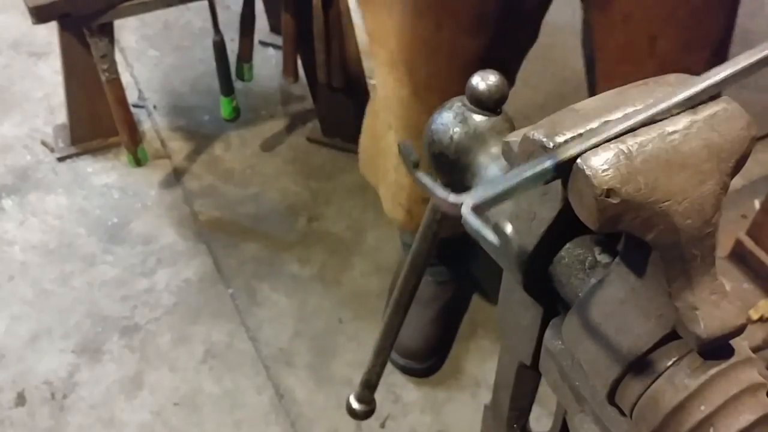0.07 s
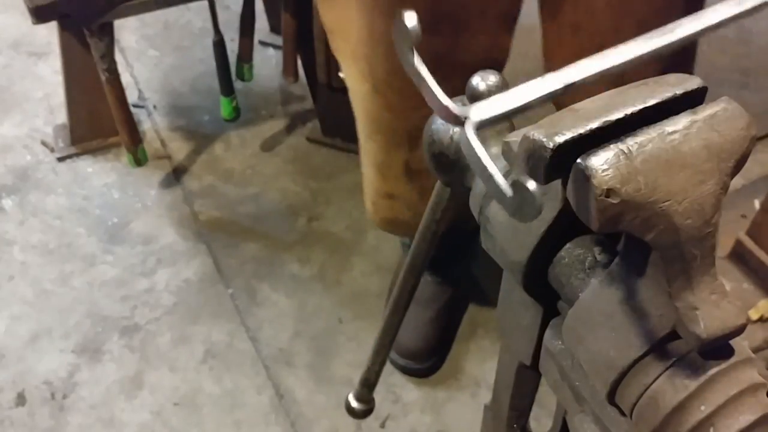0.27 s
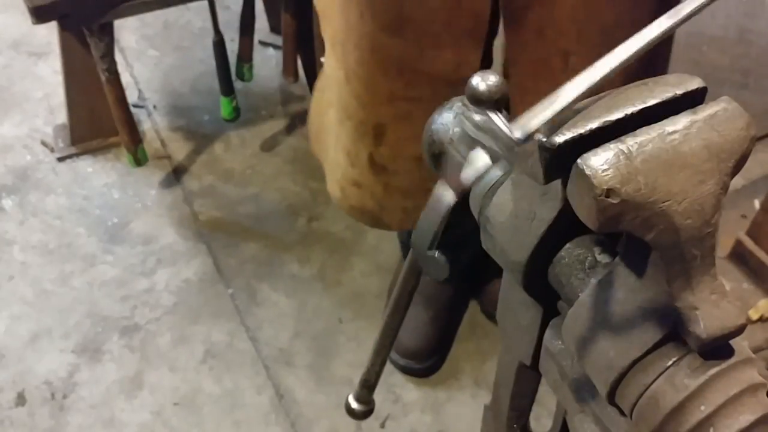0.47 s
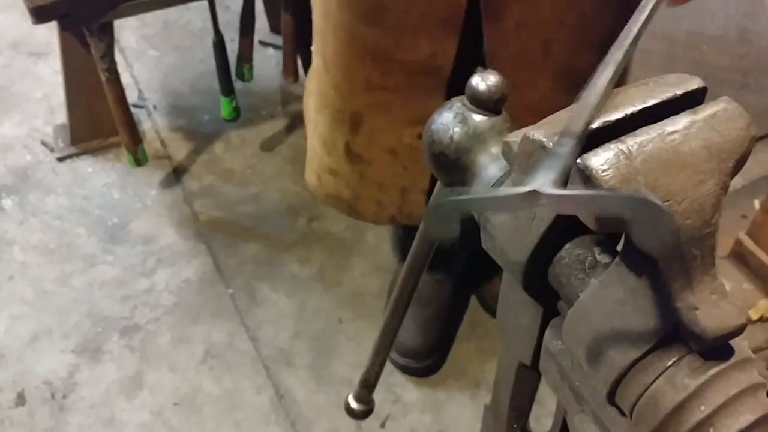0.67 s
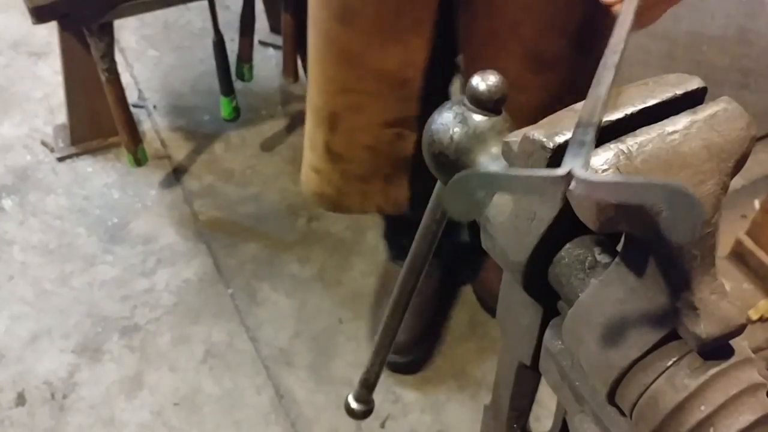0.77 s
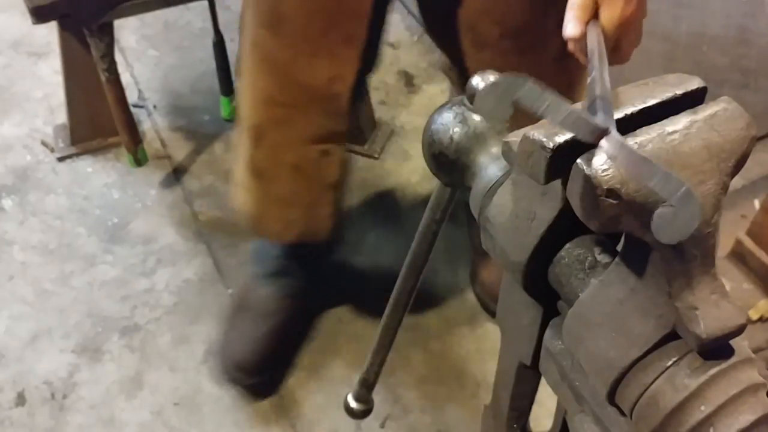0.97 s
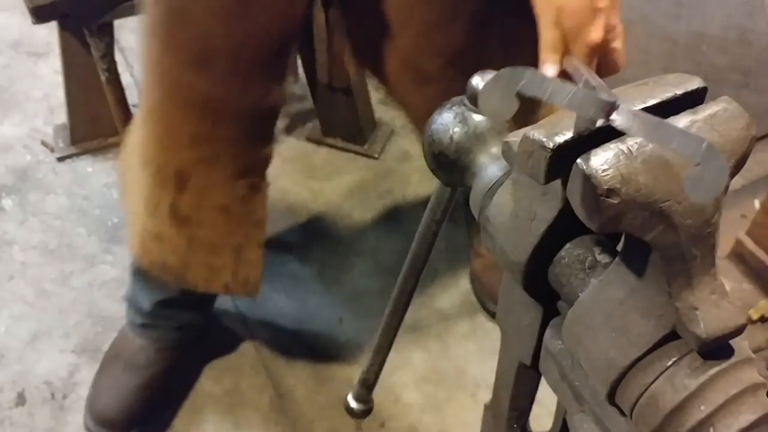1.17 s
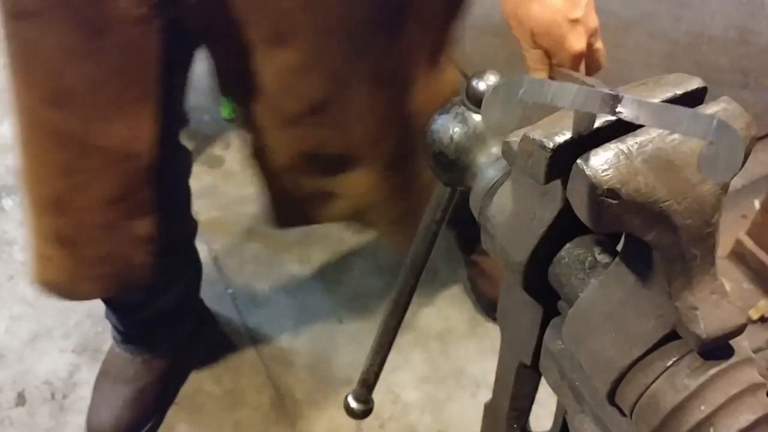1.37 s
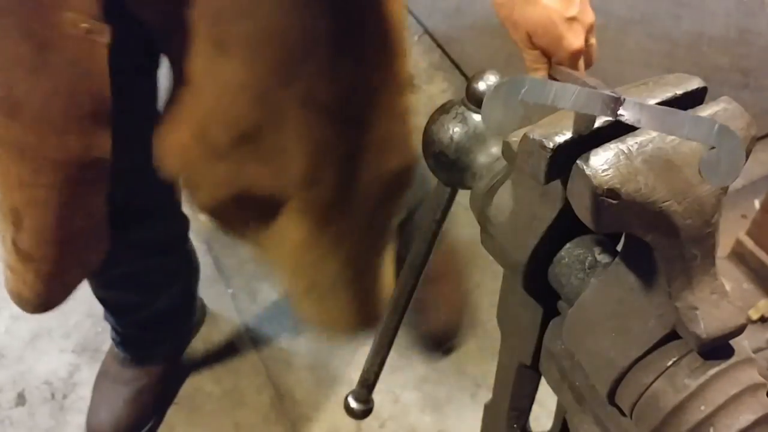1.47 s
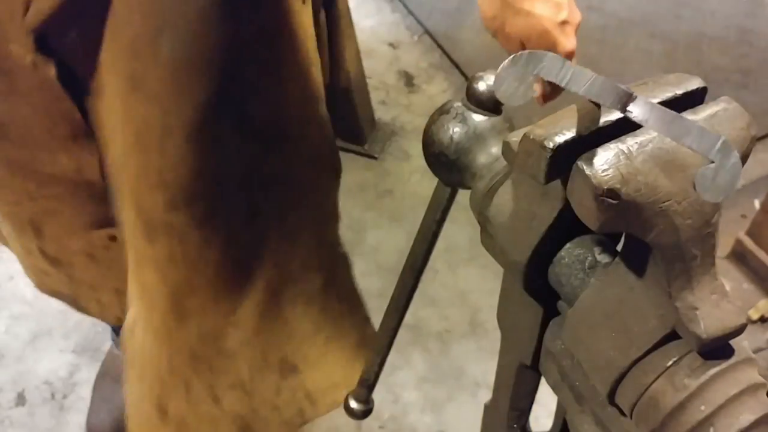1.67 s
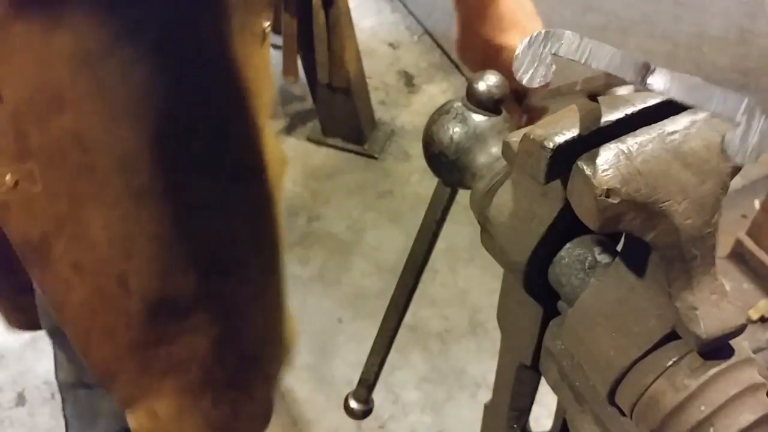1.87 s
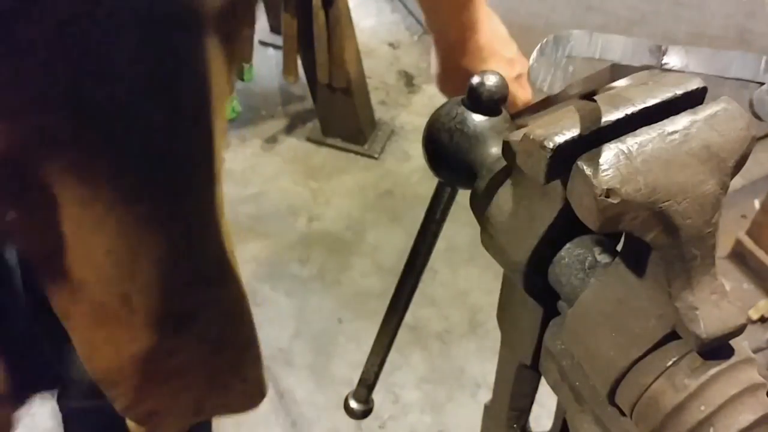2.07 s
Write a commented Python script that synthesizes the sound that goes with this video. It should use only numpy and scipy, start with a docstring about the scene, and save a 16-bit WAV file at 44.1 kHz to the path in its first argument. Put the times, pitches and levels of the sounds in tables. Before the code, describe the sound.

A forged steel piece comes off a vise with one crisp clink and a short ringing rattle, between boot scuffs and steps on concrete and soft leather rustle; quiet room hum, short reverb, close microphone.

```python
"""A small, hard-walled workshop: a forged steel hook comes free of a bench vise.
It scrapes along the jaw and clinks, then knocks against the vise and chatters on it for a moment.
Boots scuff and step on the concrete and a leather apron rustles, over room air, a low hum and rumble.
Steel rings as decaying, beating modes with short noise clashes; rubbing is shaped noise;
footfalls are hollow modal knocks over puffs of noise. Walls answer the steel and the footwork."""
import sys
import numpy as np
from scipy import signal
from scipy.fft import rfft, irfft, next_fast_len
from scipy.io import wavfile
from scipy.ndimage import map_coordinates

SR = 44100
rng = np.random.default_rng(int(sys.argv[2]) if len(sys.argv) > 2 else 0)


def master_out(mix):
    """Clip the mix to full scale and print it as 16-bit PCM to the path in sys.argv[1]."""
    frames = np.transpose(np.atleast_2d(mix))
    ceiling = np.clip(frames, -1, 1)
    pcm = np.round(ceiling * 32767).astype(np.int16)
    wavfile.write(sys.argv[1], SR, pcm)


N = 93271  # length [samples]


def amp(db):
    """Decibels to gain."""
    return 10 ** (np.asarray(db) / 20)


def unit(x):
    """Scale to rms 1."""
    return x / np.sqrt(np.mean(x ** 2) + 1e-20)


def along(points, hz):
    """Read a table of (frequency [Hz], value) at any pitch, on a log axis."""
    f, v = np.transpose(points)
    return np.interp(np.log(hz + 1), np.log(f + 1), v)


def seconds():
    """The time of each sample."""
    return np.arange(N) / SR


def wobble(rate, t=None):
    """A smooth random curve with rate random knots a second, read at times t."""
    if t is None:
        t = seconds()
    knots = rng.standard_normal(int(N * rate / SR) + 4)
    return map_coordinates(knots, [t * rate])


def filtered(x, response):
    """x shaped by a gain that depends on frequency; padding keeps the end off the start."""
    m = next_fast_len(x.shape[-1] + SR // 5)
    gain = response(np.fft.rfftfreq(m, 1 / SR))
    return irfft(rfft(x, m) * gain, m)[..., :x.shape[-1]]


# how alike the two channels of noise are: (frequency [Hz], likeness [0 to 1])
LIKENESS = [(60, 0.94), (140, 0.84), (300, 0.83), (700, 0.36), (1400, 0), (4000, 0), (12000, 0.1)]


def noise(spectrum, size=N):
    """Coloured stereo noise of rms 1, near mono in the bass and wide above."""
    def middle_and_side(hz):
        turn = np.arccos(np.clip(along(LIKENESS, hz), -1, 1)) / 2
        return amp(along(spectrum, hz)) * [np.cos(turn), np.sin(turn)]

    mid, side = filtered(rng.standard_normal((2, size)), middle_and_side)
    return unit(np.array([mid + side, mid - side]))


PIVOT_HZ = 3480  # brightness tilts about this pitch


def tilted(spectrum, tilt_db, from_hz=1):
    """The spectrum tilted by tilt_db an octave about the pivot, with no further tilt below from_hz."""
    return [(hz, db + tilt_db * np.log2(max(hz, from_hz) / PIVOT_HZ)) for hz, db in spectrum]


def fade(t, t60):
    """Exponential decay by 60 dB in t60 seconds."""
    return np.exp(-np.log(1000) * t / t60)


def burst(spectrum, t60, attack):
    """A coloured puff of noise that rises and dies away, times in seconds."""
    t = np.arange(SR // 2) / SR
    return noise(spectrum, size=len(t)) * fade(t, t60) * (1 - np.exp(-t / attack))


def friction(spectrum, grain_db, grain_rate):
    """Rubbing: noise of rms 1, clumped into tiny slips by a random level."""
    return unit(noise(spectrum) * amp(grain_db * wobble(grain_rate)))


def swells(rows):
    """Level of strokes that climb 20 dB in their rise time and drop 20 dB in their fall time."""
    t, power = seconds(), 0
    for peak_s, db, rise, fall in rows:
        drop_db = 20 * np.maximum((peak_s - t) / rise, (t - peak_s) / fall)
        power = power + amp(db - drop_db) ** 2
    return np.sqrt(power)


def add(track, s, sound):
    """Mix a sound into the track at time s."""
    part = track[:, max(0, round(s * SR)):][:, :sound.shape[1]]
    part += sound[:, :part.shape[1]]


# how long the workshop answers: (frequency [Hz], t60 [s])
ROOM = [(100, 0.057), (300, 0.47), (1000, 0.26), (2500, 0.25), (5000, 0.25), (9000, 0.23), (15000, 0.13)]
WALL_S = 0.0051  # time scale over which the walls' answer builds up [s]


def in_room(x, wet_db):
    """The direct sound plus the walls' answer: noise whose pitches die at their own rates."""
    flat = [(1, 0.011), (2, 0)]
    hz, t, z = signal.stft(noise(flat, size=SR // 2), SR, nperseg=256)
    tail = signal.istft(z * fade(t, along(ROOM, hz)[:, None]), SR, nperseg=256)[1]
    tail_s = np.arange(tail.shape[1]) / SR
    tail = tail * (1 - np.exp(-(tail_s / WALL_S) ** 2))
    answer = signal.fftconvolve(x, tail / np.linalg.norm(tail[0]), axes=1)[:, :x.shape[1]]
    return x + amp(wet_db) * answer


# colour of the room air: (frequency [Hz], relative level [dB])
AIR = [(35, -32), (60, -5), (107, -0.5), (160, -7.5), (250, -11), (370, -13.5), (600, -14), (1000, -19.5),
       (1750, -24.5), (4000, -26.5), (7000, -32), (9000, -25), (10600, -38.5), (15500, -31)]


def air():
    """The steady noise of the workshop air."""
    return amp(-63.5) * noise(AIR)


def hum():
    """A low tone whose phase and level waver."""
    phase = 2 * np.pi * 102.2 * seconds() + 3.03 * wobble(10)
    return np.sin(phase) * amp(-68.5 + 6.4 * wobble(6))


# surges of the rumble: (time of peak [s], level [dB], rise [s], fall [s])
SURGES = [(.04, -62, 0.033, 0.071), (.33, -54, 0.094, 0.067), (.99, -58.5, 0.14, 0.06),
          (1.64, -59.5, 0.059, 0.071)]
# colour of the rumble: (frequency [Hz], relative level [dB])
RUMBLE = [(55, -14), (110, 6.5), (170, -14.5), (350, -29.5), (1000, -55)]


def rumble():
    """Low noise that comes and goes."""
    return swells(SURGES) * noise(RUMBLE)


def background():
    """Room air, a wavering low hum and a surging rumble."""
    return air() + hum() + rumble()


# a boot shifts softly: (time of peak [s], level [dB], rise [s], fall [s])
SHUFFLES = [(1.525, -64, 0.078, 0.067)]
# colour of the shuffle: (frequency [Hz], relative level [dB])
SHUFFLE = [(150, -14), (400, 5), (720, 1), (1100, -17), (3000, -30), (12000, -37)]


def shuffle():
    """A soft, dull swell of noise as a boot shifts."""
    return swells(SHUFFLES) * noise(SHUFFLE)


# a thin swish just before the last steps: (time of peak [s], level [dB], rise [s], fall [s])
SWISHES = [(1.807, -60, 0.035, 0.073)]
# colour of the swish: (frequency [Hz], relative level [dB])
SWISH = [(1000, -21), (3200, -9.5), (4200, -2), (4900, 1), (5700, -12), (9000, -20), (15000, -24.5)]


def swish():
    """A narrow swell of treble noise."""
    return swells(SWISHES) * noise(SWISH)


# the apron swings: (time of peak [s], level [dB], rise [s], fall [s], brightness [dB per octave])
SWINGS = [(1.387, -55.5, 0.16, 0.11, -0.5), (1.898, -56, 0.0598, 0.17, -1),
          (2.101, -54.5, 0.16, 0.19, -0.5)]
# colour of rubbing leather before that tilt: (frequency [Hz], relative level [dB])
LEATHER = [(100, 5.5), (400, 0.5), (1000, -0.5), (1600, 2), (2500, -0.5), (4800, 0), (7000, -5.5),
           (9000, 3.5), (10600, -9), (15500, -9)]


def apron():
    """Leather rustles: each swing is friction noise, grainy where the leather creases."""
    out = np.zeros((2, N))
    for *stroke, tilt_db in SWINGS:
        out += swells([stroke]) * friction(tilted(LEATHER, tilt_db), grain_db=2.8, grain_rate=170)
    return out


# a crumb of grit cracks: (time [s], level [dB])
CRUMBS = [(1.772, -50)]
# colour of the crack: (frequency [Hz], relative level [dB])
CRUMB = [(1000, -32), (4000, -23), (9000, 12), (11000, -3.5), (15500, 2.5)]


def crumbs():
    """Grit cracks in a short puff of bright noise."""
    out = np.zeros((2, N))
    for s, db in CRUMBS:
        add(out, s, amp(db) * burst(CRUMB, t60=0.032, attack=0.00092))
    return out


# soles slide: (time of peak [s], level [dB], rise [s], fall [s], brightness [dB per octave])
SCUFFS = [(.01, -46, 0.15, 0.08, -3), (0.138, -58, .04, 0.046, -3.5), (0.282, -53, 0.024, 0.032, 2),
          (0.323, -43, 0.046, 0.042, 0.5), (1.216, -56.5, 0.017, 0.03, 0.5),
          (1.238, -50, 0.046, 0.045, 4.5), (1.859, -49.5, 0.043, 0.058, 1)]
# colour of gritty concrete before that tilt: (frequency [Hz], relative level [dB])
GRIT = [(100, -9.5), (250, -8), (500, 0), (850, 1.5), (1500, -6), (3400, -14), (5500, -11), (7300, -15),
        (9100, -0.5), (10600, -19.5), (15500, -20.5)]


def scuffs():
    """Soles slide on gritty concrete as swells of noise."""
    out = np.zeros((2, N))
    for *stroke, tilt_db in SCUFFS:
        out += swells([stroke]) * noise(tilted(GRIT, tilt_db))
    return out


# modes of a boot heel: (frequency [Hz], mean relative level [dB], t60 [s])
HEEL = [(380, -4, 0.08), (560, -2, 0.025), (710, 1, 0.04), (855, 2, 0.06), (1040, -5, 0.03),
        (1310, -4, .03), (1740, -13, 0.03)]
# colour of the dull puff under the knock: (frequency [Hz], relative level [dB])
BOOT = [(60, -30), (130, 1), (280, 2), (500, -2.5), (820, -7), (1300, -20), (2500, -6.5), (5000, -35.5),
        (12000, -78)]


def footfall():
    """A boot meets concrete: a short hollow knock of decaying modes over a dull puff."""
    t = np.arange(SR // 2) / SR
    knock = np.zeros(len(t))
    for hz, db, t60 in HEEL:
        varied_db = db + 2 * rng.standard_normal()
        knock += amp(varied_db) * fade(t, t60) * np.sin(2 * np.pi * hz * t)
    knock *= 1 - np.exp(-t / 0.001)
    return amp(3) * knock + amp(-6) * burst(BOOT, t60=0.13, attack=0.00058)


# boot contacts in quick clusters: (time [s], gain on the footfall [dB])
STEPS = [(.001, -47.5), (.015, -56), (0.038, -54), (.056, -52), (1.238, -57), (1.8348, -50), (1.8438, -47),
         (1.8505, -50.5), (1.8578, -58), (1.875, -76)]


def steps():
    """Boots land, each contact a fresh knock."""
    out = np.zeros((2, N))
    for s, db in STEPS:
        add(out, s, amp(db) * footfall())
    return out


def footwork():
    """Boots, grit, apron and swish share the workshop's answer and sit slightly left."""
    close = scuffs() + apron() + swish() + shuffle() + steps() + crumbs()
    left_db = 1.66  # left minus right
    return in_room(close, wet_db=-8.5) * amp([[left_db / 2], [-left_db / 2]])


CHATTER_DB, CHATTER_HZ = 1.6, 600  # steel roughens on steel: depth, random knots a second

# the hook drags over the jaw: (time [s], level before the room [dB])
DRAG = [(0.523, -81), (0.528, -47), (0.545, -42.5), (0.562, -36.5), (0.58, -37.5), (.586, -75)]
# colour of the scrape: (frequency [Hz], relative level [dB])
RASP = [(50, -4.5), (110, 8), (250, -1.5), (900, -1), (1350, -6.5), (1680, 3.5), (2150, -14), (2780, 2.5),
        (3500, -6.5), (5600, 0.5), (7300, -1.5), (8400, 6), (9300, 3.5), (10600, -10.5), (15500, -7.5)]


def scrape():
    """Steel drags on steel just before the first clink, its friction catching and slipping."""
    level_db = np.interp(seconds(), *np.transpose(DRAG), left=-np.inf, right=-np.inf)
    return in_room(amp(level_db) * friction(RASP, CHATTER_DB, CHATTER_HZ), wet_db=-14)


# the vise's stand: (frequency [Hz], relative level [dB])
THUD = [(25, -43.5), (60, -9), (110, -3), (165, 1), (210, -10.5), (260, -10.5), (400, -13.5), (560, -9.5),
        (1200, -60)]


def thud():
    """The stand under the vise answers a contact with a low puff."""
    return burst(THUD, t60=0.19, attack=0.0028)


STRIKE_S = 0.0015  # time scale of the steel's onset [s]
TIP_T60, SHANK_T60 = 0.037, 0.1  # [s]: the clash is crisp at the tip and grinds longer on the shank

# crowded short-lived modes of the vise, before the tilt of each contact:
# (frequency [Hz], relative level struck by the tip [dB], relative level struck by the shank [dB])
CLASH = [(150, -32, -38), (300, -16.5, -33), (560, -6.5, -5), (750, -11.5, -17), (1080, -5, -10.5),
         (1500, -12.5, -9.5), (2180, -5, -1), (2700, -4, -8.5), (3350, -1, -1), (3700, -3.5, -18.5),
         (3960, -5, -20), (4180, 2.5, 4), (4710, -12.5, -5), (5570, -7, -5), (7200, -13.5, -15),
         (9370, -13.5, -11.5), (10080, -51, -64), (15000, -38, -57)]


def clash(place, tilt_db):
    """The crowded modes of the vise as a noise puff, roughened as the two faces chatter."""
    colour = [(hz, np.interp(place, [0, 1], levels_db)) for hz, *levels_db in CLASH]
    colour = tilted(colour, tilt_db, from_hz=PIVOT_HZ / 2)
    t60 = np.interp(place, [0, 1], [TIP_T60, SHANK_T60])
    puff = burst(colour, t60, STRIKE_S)
    chatter = unit(amp(CHATTER_DB * wobble(CHATTER_HZ)))
    return puff * chatter[:puff.shape[1]]


FLUTTER, FLUTTER_HZ = 0.42, 55  # each mode beats: depth, random knots a second
DRIFT_RAD, DRIFT_HZ = 0.22, 35  # each mode's phase wanders: depth [rad], random knots a second
TIP_RING = 0.99  # ring time at the tip as a share of that at the shank, nearly equal

# modes of hook and vise, before colour and tilt:
# (frequency [Hz], relative level struck at the tip [dB], relative level struck at the shank [dB])
STEEL = [(1110, -24, -20), (1395, -30, -16), (1690, -30, -20), (1984, -18, 2), (2015, -28, -9),
         (2133, -9, -16), (2225, 0, -31), (2258, -4, -29), (2310, -15, -13), (2405, -13, 1.5),
         (2428, -28, -5), (2545, -14, -12), (2663, -12, -18), (2952, -11, -16), (3040, -4, 0),
         (3131, -12, -3), (3163, -13, -15), (3454, -2, -5), (3875, -9, -20), (3900, -25, -3),
         (4138, -1, -21), (4216, -8, -9), (4302, -15, -3), (4351, -16, -11), (4522, -19, -19),
         (4889, -14, -12), (5216, -12, -15), (5303, -25, -4), (5350, -28, -9), (5570, -25, -13),
         (6455, -8, -14), (6620, -22, -15), (6806, -15, -11), (7270, -22, -20), (7569, -19, -21),
         (7940, -13, -15), (8225, -9, -35), (8760, -10, -32), (8927, -17, 2), (9599, -2, -36),
         (9730, -13, -42), (11270, -50, -25), (12590, -23, -47), (13290, -48, -34)]
# ring time at the shank: (frequency [Hz], t60 [s])
RING_T60 = [(1000, 0.15), (2200, 0.16), (4000, 0.12), (7000, 0.14), (9000, 0.093), (13000, 0.155)]
# colour added to the ring: (frequency [Hz], gain [dB])
RING_COLOUR = [(2000, 1), (2260, 3), (2420, 0), (3200, 3), (3500, -0.5), (4300, 3.5), (6500, -1), (9000, 6),
               (11300, 8), (13000, 1.5)]


def ring(contacts):
    """Every contact feeds the steel's modes, which beat and waver as they fade."""
    t, out = seconds(), np.zeros((2, N))
    frames = np.linspace(0, N / SR, 4000)  # coarse times for the slow curves
    s, ring_db, _, _, place, tilt_db = np.transpose(contacts)[:, :, None]
    age, place = np.maximum(frames - s, 0), np.clip(place, 0, 1)
    onset = 1 - np.exp(-age / STRIKE_S)
    for hz, tip_db, shank_db in STEEL:
        level = ring_db + tip_db + place * (shank_db - tip_db)
        level = level + along(RING_COLOUR, hz) + tilt_db * np.log2(hz / PIVOT_HZ)
        t60 = along(RING_T60, hz) * (TIP_RING + place * (1 - TIP_RING))
        # the contacts add up by power
        swing = np.linalg.norm(amp(level) * fade(age, t60) * onset, axis=0)
        for ear in out:
            beating = swing * (1 + FLUTTER * wobble(FLUTTER_HZ, frames))
            size = np.interp(t, frames, beating)
            drift = np.interp(t, frames, DRIFT_RAD * wobble(DRIFT_HZ, frames))
            ear += size * np.sin(2 * np.pi * (hz * t + rng.random()) + drift)
    return out


# hook meets vise: (time [s], ring gain [dB], clash gain [dB], thud gain [dB],
# place on the hook [0 tip to 1 shank], brightness of ring and clash [dB per octave])
CONTACTS = [(.581, -33.5, -17.5, -55.5, 0, 1.5), (.596, -43.5, -39, -48.5, 0.12, 7.5),
            (0.618, -39.5, -40, -53.5, 0.11, 2), (.643, -52.5, -63, -59, 0, -9),
            (0.7426, -32.5, -33.5, -74, 0.81, -1), (0.7482, -27.5, -25.5, -45.5, 1, -1),
            (0.757, -32.5, -33, -44, 0.8, -3.5), (0.772, -34, -36, -42, 0.93, 1),
            (.784, -40, -46.5, -43, 1, 3.5), (0.7961, -30, -24, -46.5, 0.95, -2.5),
            (0.807, -36, -32, -51.5, 1, 1.5), (0.816, -34, -38.5, -58.5, 0.75, 5.5),
            (0.848, -59.5, -45.5, -44.5, 0.34, -20), (0.872, -48.5, -54.5, -46, 0.42, -7)]
# stereo lean of the steel: (frequency [Hz], left minus right [dB])
STEEL_BALANCE = [(300, 2), (700, -0.5), (2400, 1), (3100, 2), (3600, 5.5), (4300, 4), (5300, 1), (9000, 2)]


def clinks():
    """Every contact rings the steel, clashes on the jaw and thuds through the stand."""
    clashes, thuds = np.zeros((2, N)), np.zeros((2, N))
    for s, _, clash_db, thud_db, place, tilt_db in CONTACTS:
        add(clashes, s, amp(clash_db) * clash(place, tilt_db))
        add(thuds, s, amp(thud_db) * thud())
    metal = in_room(ring(CONTACTS), wet_db=-12) + in_room(clashes, wet_db=-3.5)
    metal = filtered(metal, lambda hz: amp(along(STEEL_BALANCE, hz) * [[.5], [-.5]]))
    return metal + thuds


def scene():
    """The workshop from its background to the steel on the vise."""
    return background() + footwork() + scrape() + clinks()


LOW_HZ, TOP_HZ = 40, 15850  # the microphone's half-gain pitch in the bass, and its upper limit


def record(dry):
    """The microphone sheds the deepest bass and keeps nothing above its band limit."""
    return filtered(dry, lambda hz: (hz < TOP_HZ) * hz ** 4 / (hz ** 4 + LOW_HZ ** 4))


dry = scene()
out = record(dry)
master_out(out)
```